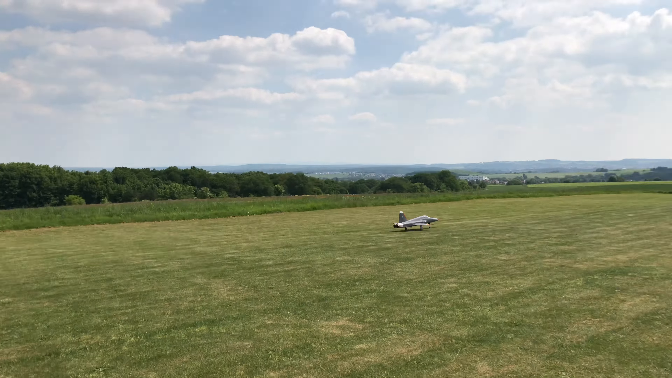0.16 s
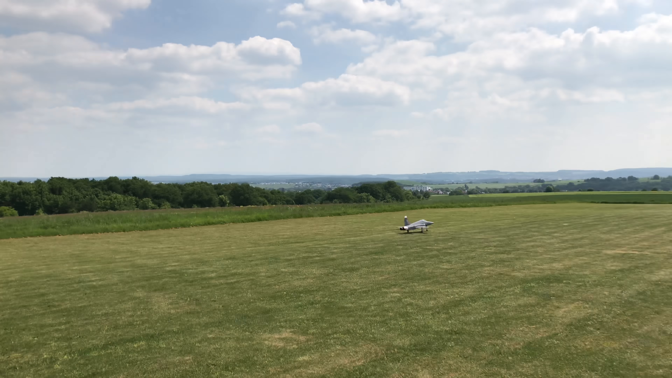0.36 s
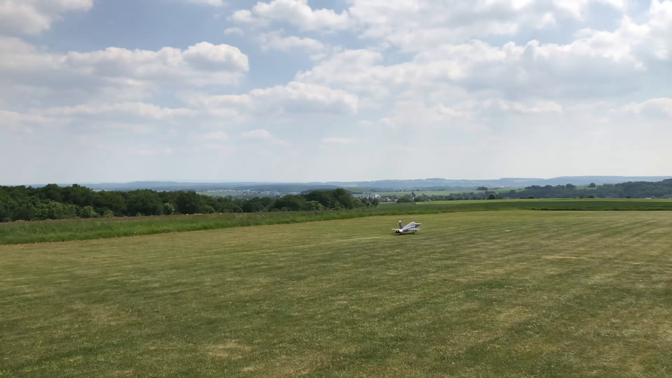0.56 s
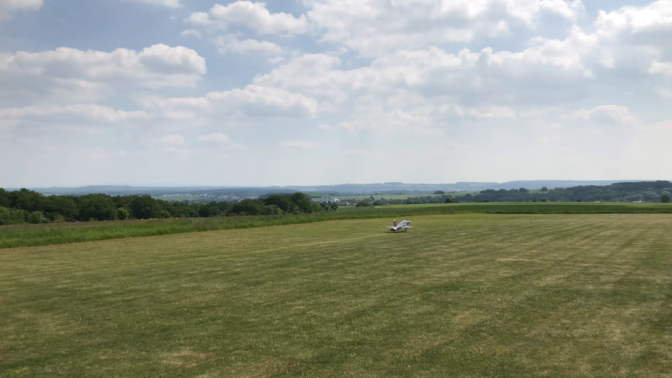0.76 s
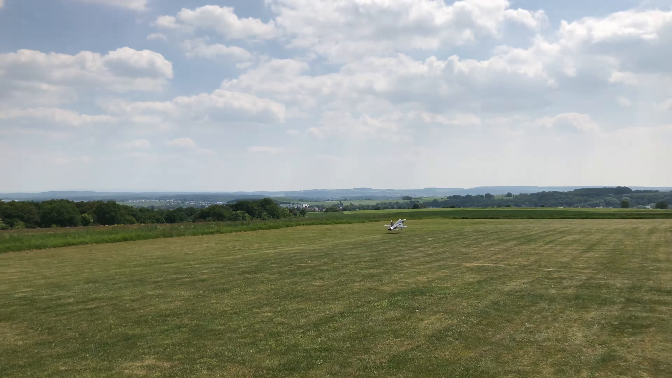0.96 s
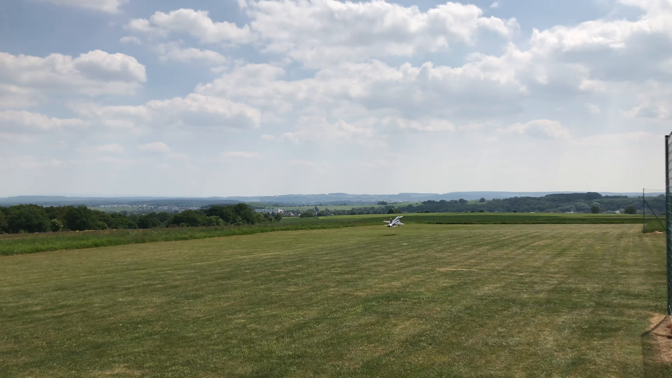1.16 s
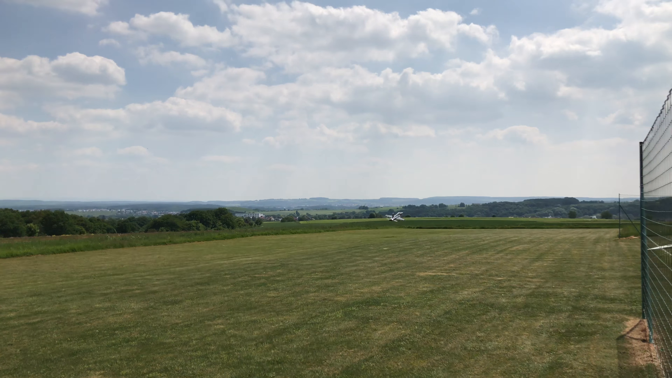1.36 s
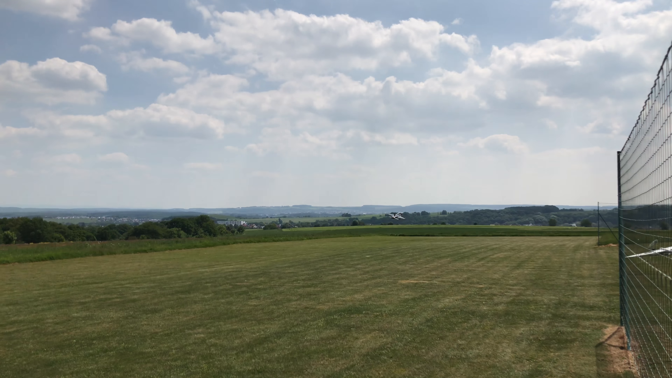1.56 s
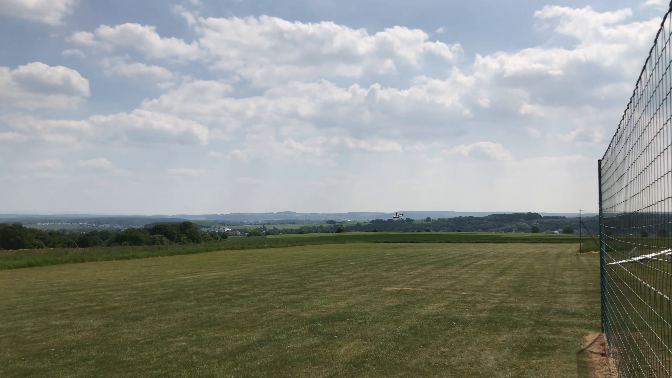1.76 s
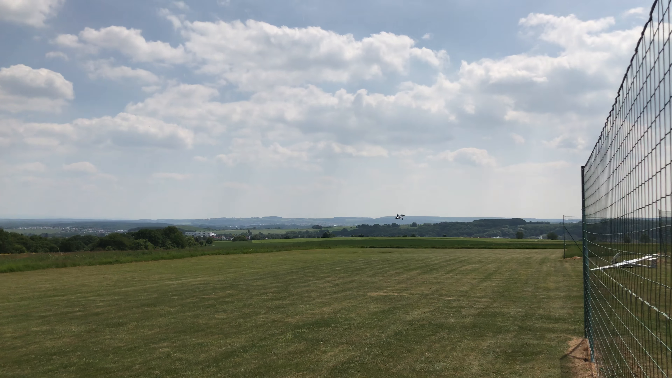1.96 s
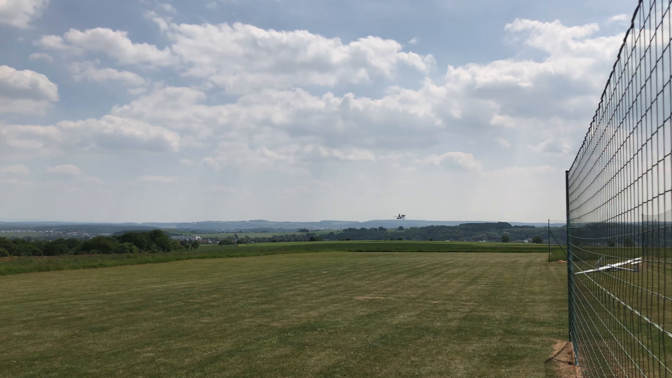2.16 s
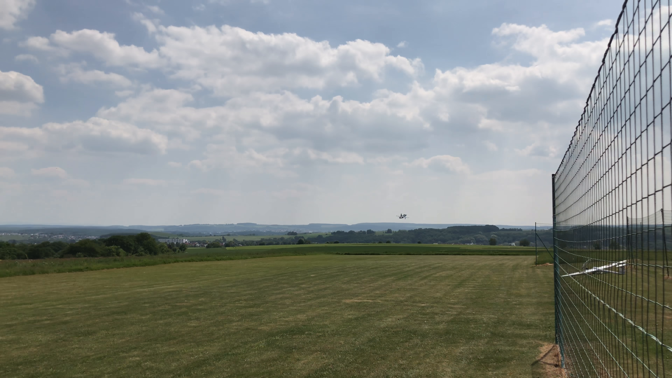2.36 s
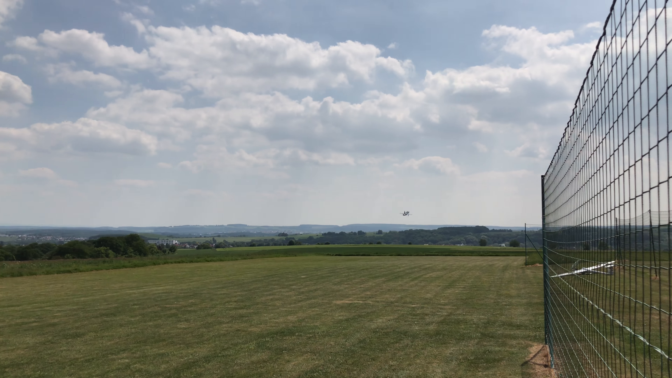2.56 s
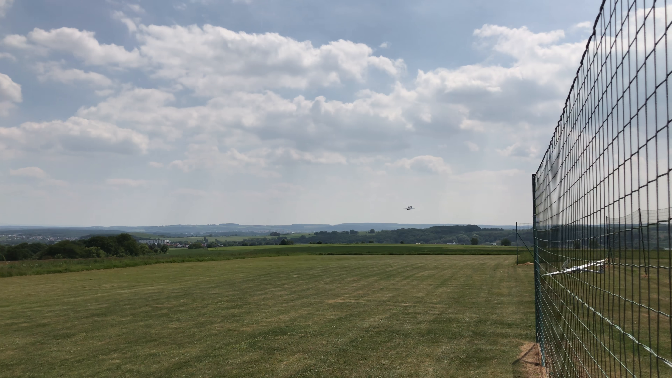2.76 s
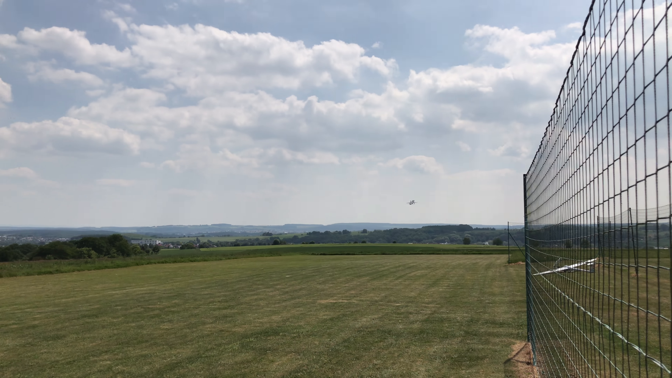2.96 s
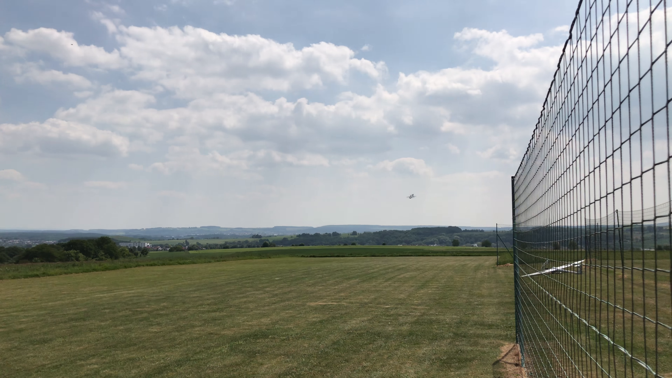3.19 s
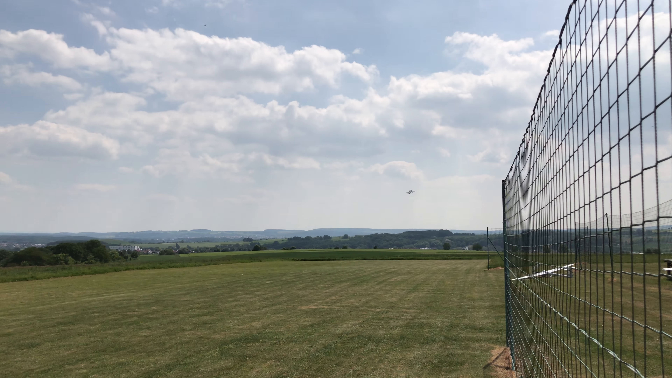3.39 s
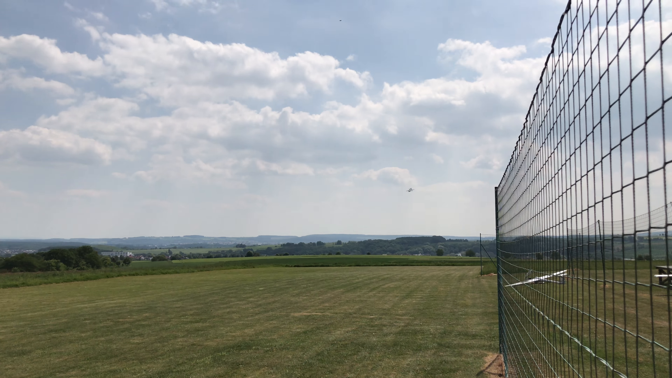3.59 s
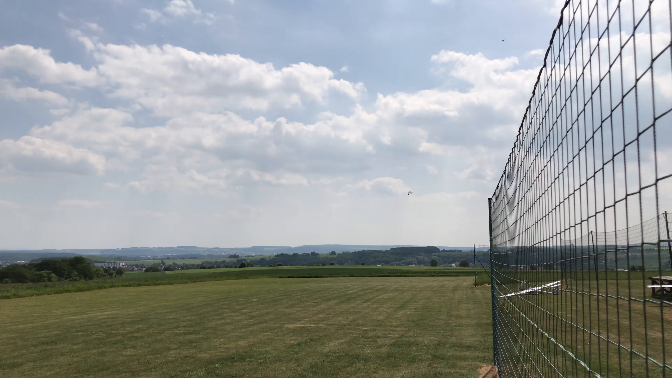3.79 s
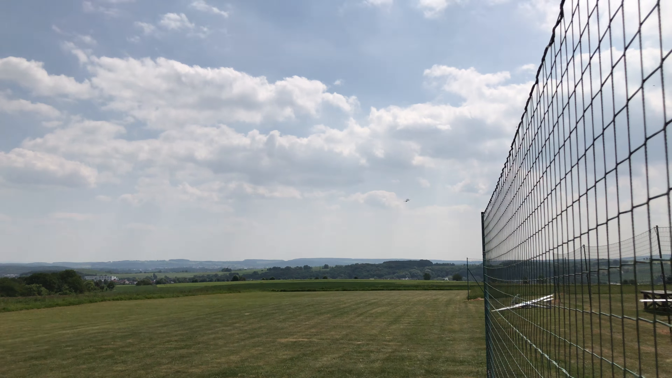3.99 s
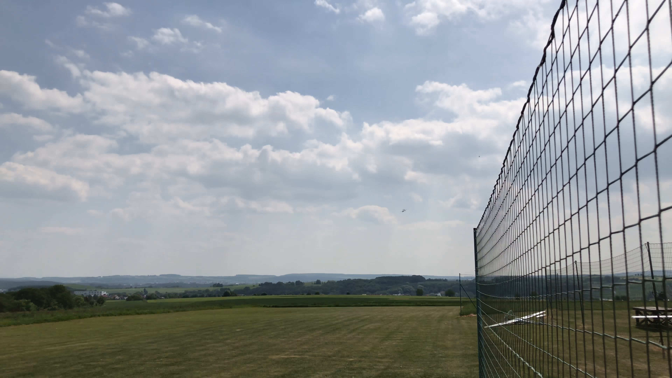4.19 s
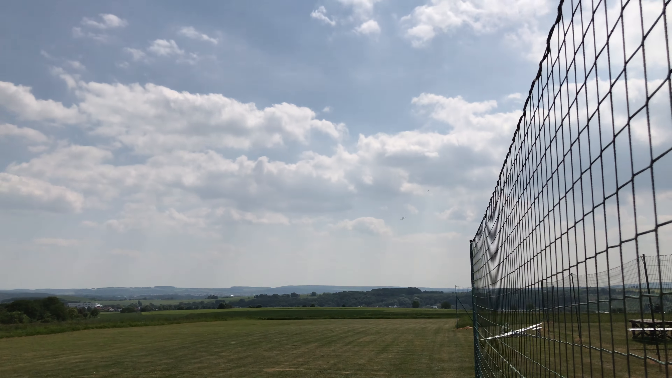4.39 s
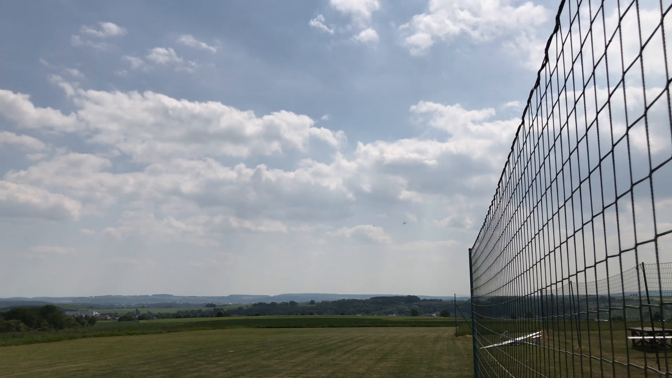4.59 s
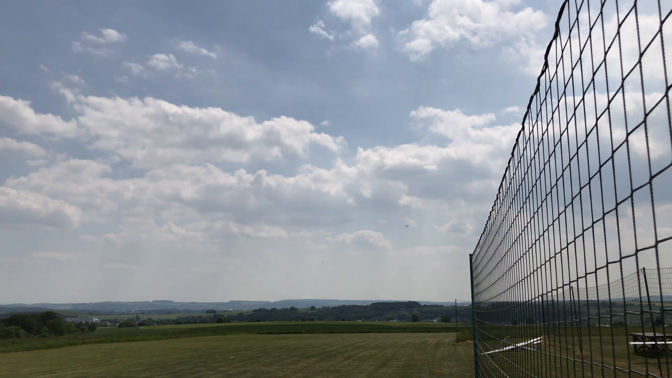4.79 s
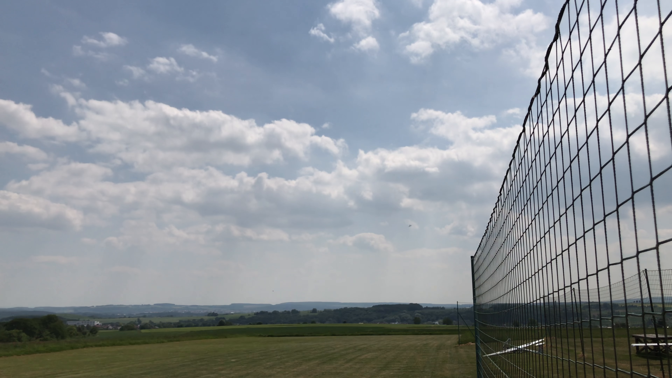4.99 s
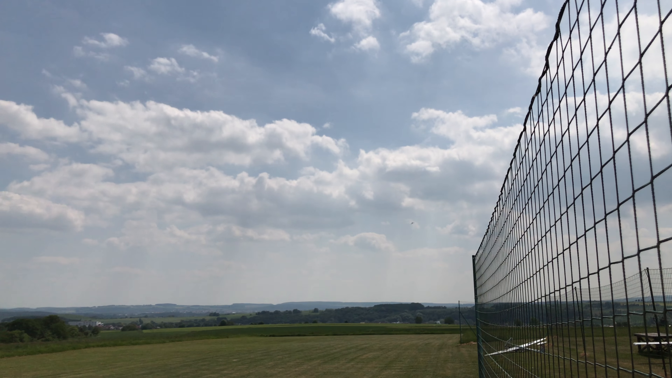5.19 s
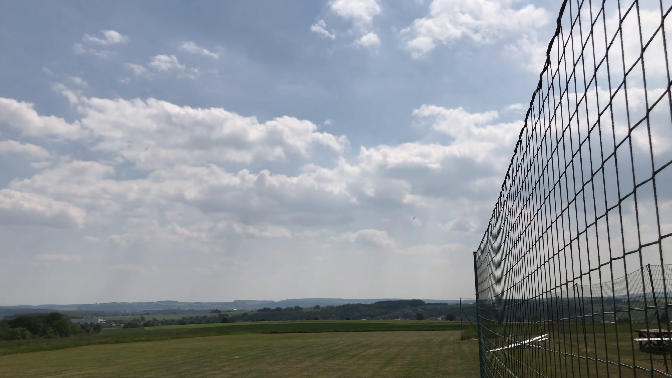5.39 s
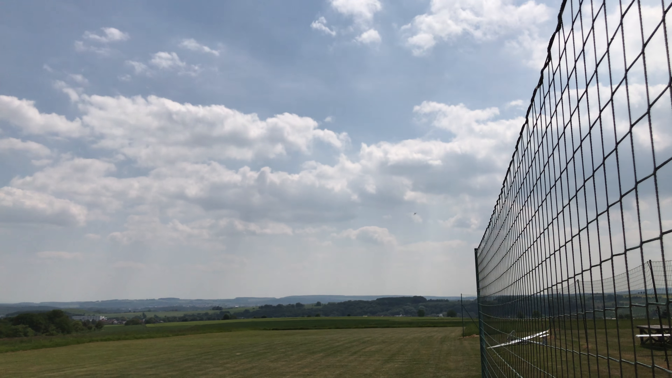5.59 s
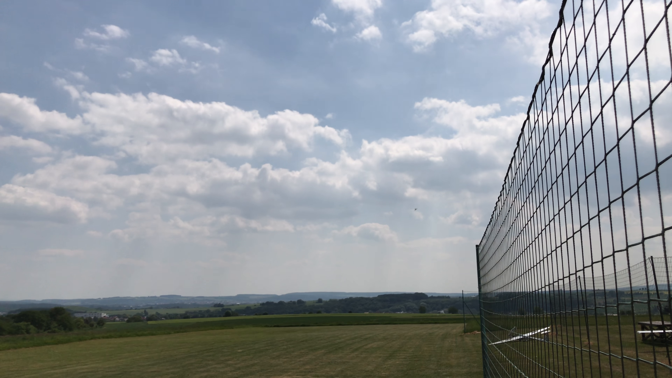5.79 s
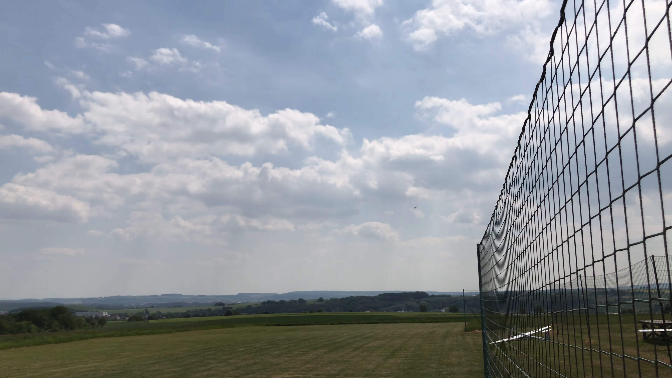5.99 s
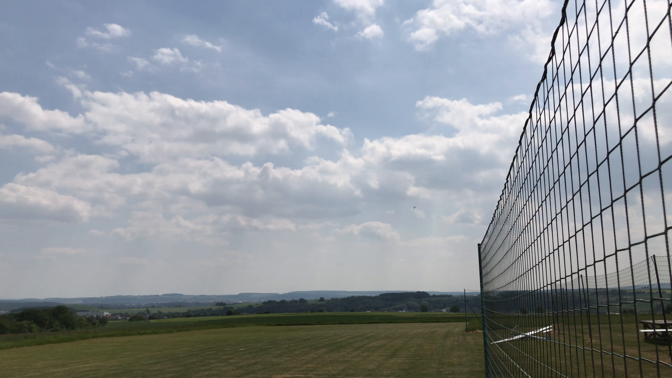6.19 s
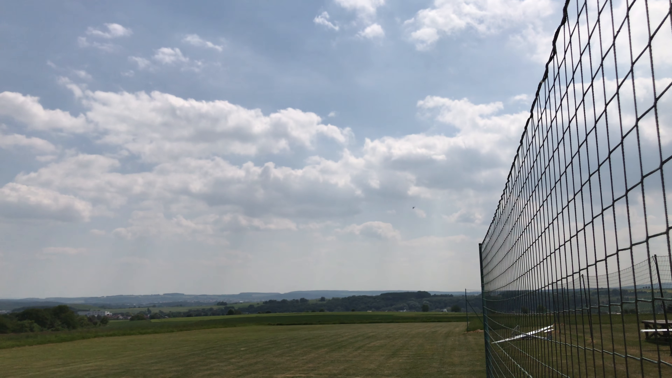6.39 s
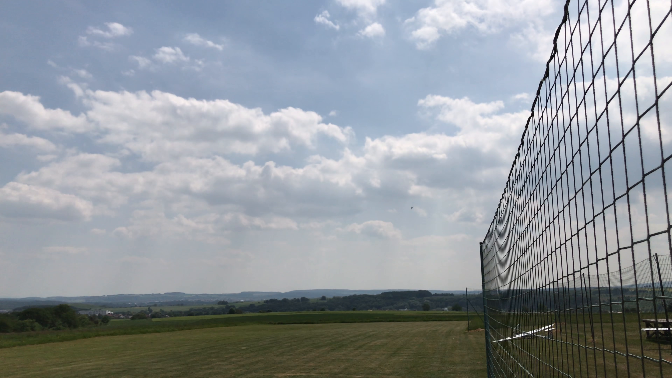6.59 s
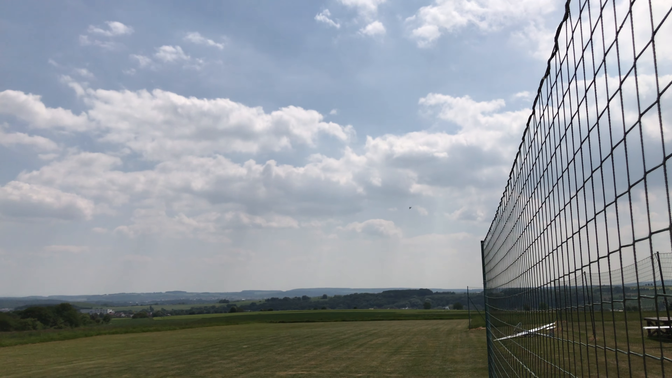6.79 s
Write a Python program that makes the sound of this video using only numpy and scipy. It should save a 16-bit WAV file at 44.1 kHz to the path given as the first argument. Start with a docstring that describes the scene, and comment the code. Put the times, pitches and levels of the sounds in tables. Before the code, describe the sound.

A model jet's high electric fan whine and rushing hiss fade as it flies away over a field, later dropping in pitch.

```python
"""Model jet taking off from grass

Two electric ducted fans whine slightly apart in pitch over their hiss and the roar of the exhaust;
turbulent air smears the tones. As the jet climbs away, interference with the echo off the grass sweeps
a comb of notches down through the noise, and air absorption dulls it. Far out the throttle is pulled
back, then opened a little. A breeze and a low hum rumble underneath."""
import sys
import numpy as np
from scipy import signal
from scipy.fft import rfft, irfft
from scipy.io import wavfile
from scipy.ndimage import uniform_filter1d

SR = 44100
rng = np.random.default_rng(int(sys.argv[2]) if len(sys.argv) > 2 else 0)


def wav_out(sig):
    """Save sig, one row per channel (or a flat mono array), as 16-bit PCM at SR to the path in sys.argv[1]."""
    wavfile.write(sys.argv[1], SR, np.round(np.clip(np.atleast_2d(sig).T, -1, 1) * 32767).astype(np.int16))


N = 302085
SIZE, HOP = 2048, 256
T = np.arange(N) / SR
FRAME_T = np.arange(N // HOP + 3) * HOP / SR
BIN_HZ = np.fft.rfftfreq(SIZE, 1 / SR)
START_M, TOP_SPEED_M_PER_S, SPEED_UP_S, SOUND_M_PER_S = 5.1, 20, 1.6, 343
FULL_HZ = 5235  # blade-passing frequency of the slower fan at full throttle

# The fans' treble, hiss and octave alike. Each row: time in seconds, relative level in dB.
TREBLE_LEVEL = [(0.0, -29.5), (0.22, -26.5), (0.28, -30.5), (0.4, -27.5), (0.67, -39), (0.77, -35.5),
                (0.84, -42.5), (1.12, -39), (1.22, -46), (1.32, -43), (2.38, -48.5), (3.27, -57.5),
                (3.45, -54.9), (3.8, -63), (3.95, -60), (4.27, -78.5), (4.47, -69.5), (4.7, -85),
                (5.37, -80.5), (5.87, -94.5), (6.85, -94)]
# The exhaust's roar. Each row: time in seconds, relative level in dB.
EXHAUST_LEVEL = [(0.0, -36), (0.12, -35.5), (0.25, -38.5), (1.17, -45.5), (1.65, -37), (2.07, -36.5),
                 (5.5, -59.5), (6.85, -60)]


def amp(db):
    """Amplitude ratio of a level in decibels."""
    return 10 ** (np.asarray(db) / 20)


def unit(x):
    """Normalisation to an rms of 1."""
    return x / np.sqrt(np.mean(abs(x) ** 2) + 1e-20)


def curve(rows, t):
    """Linear interpolation of a table of times and values."""
    return np.interp(t, *np.transpose(rows))


def shape(spectrum):
    """Gain per bin, interpolated in decibels on a log-frequency axis."""
    hz, db = np.transpose(spectrum)
    return amp(np.interp(np.log(BIN_HZ + 1), np.log(hz), db))


def flutter(width_hz, steep_above=2, steep_below=2):
    """Narrow-band complex noise of rms 1, falling away beyond width_hz on either side of zero."""
    hz = np.fft.fftfreq(N, 1 / SR)
    steep = np.where(hz > 0, steep_above, steep_below)
    white = rng.standard_normal(N) + 1j * rng.standard_normal(N)
    return unit(np.fft.ifft(white / np.sqrt(1 + abs(hz / width_hz) ** (2 * steep))))


def noise(gain, band_hz):
    """Spectral shaping of white noise, held near an rms of 1 inside the band."""
    inside = (BIN_HZ >= band_hz[0]) & (BIN_HZ <= band_hz[1])
    gain = gain / np.sqrt(np.sum(gain[..., inside] ** 2, -1, keepdims=True) / len(BIN_HZ))
    white = rng.standard_normal((len(FRAME_T) - 1) * HOP)
    frames = signal.stft(white, nperseg=SIZE, noverlap=SIZE - HOP)[2].T * gain
    return signal.istft(frames.T, nperseg=SIZE, noverlap=SIZE - HOP)[1][:N]


def speed(t):
    """Drag limits acceleration: the receding jet's speed in m/s levels off exponentially."""
    return TOP_SPEED_M_PER_S * (1 - np.exp(-t / SPEED_UP_S))


def distance(t):
    """Metres from the microphone: the start plus the integral of the speed."""
    return START_M + TOP_SPEED_M_PER_S * t - SPEED_UP_S * speed(t)


def throttle(t):
    """Fan speed, 1 at full power, is proportional to the blade-passing frequency."""
    # The slower fan on board. Each row: time in seconds, blade-passing frequency in Hz.
    blade_passing = [(3.92, FULL_HZ), (4.0, 4870), (4.1, 4555), (4.22, 4360), (4.33, 4020), (4.53, 3905),
                     (4.65, 3525), (5.5, 3335), (5.95, 3490), (6.35, 3500), (6.63, 3850), (6.72, 4145),
                     (6.85, 4260)]
    return curve(blade_passing, t) / FULL_HZ


def doppler_pitch(t):
    """The Doppler effect lowers the slower fan's tone, in Hz, as the jet recedes."""
    return FULL_HZ * throttle(t) / (1 + speed(t) / SOUND_M_PER_S)


def blade_tone(hz, clean_share, halo_hz, halo_shift_hz=20):
    """Random modulation: blades chopping turbulence spread a lopsided halo around a wavering line."""
    line = unit(1 + .35 * flutter(6))
    halo = flutter(halo_hz, steep_above=1.3, steep_below=1.85)
    halo = halo * np.exp(2j * np.pi * halo_shift_hz * T)
    envelope = np.sqrt(clean_share) * line + np.sqrt(1 - clean_share) * halo
    carrier = np.exp(2j * np.pi * np.cumsum(hz) / SR)
    return np.sqrt(2) * (carrier * envelope).real


def fan_whine(gain_db=-.5, lead_hz=213, closing_hz_per_s=19, smear_m=32):
    """Blade passage gives each fan a tone and its octave; turbulence on the path broadens both."""
    # The fan tones. Each row: time in seconds, relative level in dB.
    tone_level = [(0.0, -21.5), (0.23, -21.0), (0.3, -24.5), (0.57, -26.5), (0.65, -35.5), (0.77, -25.5),
                  (0.85, -34), (0.92, -26), (1.03, -35.5), (1.17, -26), (1.27, -45.5), (1.42, -26),
                  (1.55, -34.8), (1.77, -28.5), (1.9, -38), (2.07, -33.5), (2.92, -36), (3.05, -44.1),
                  (3.4, -40.5), (3.82, -50.5), (4.05, -44.5), (4.8, -58.5), (5.12, -53.5), (5.72, -72),
                  (6.85, -62.5)]
    # Balance of the fans. Each row: time in seconds, the faster fan's share of the power.
    balance = [(0, 0.32), (1.25, 0.63), (1.5, 0.73), (2.2, 0.6), (2.6, 0.24), (4.1, 0.42), (6.85, 0.5)]
    slower_hz, fan_speed, share = doppler_pitch(T), throttle(T), curve(balance, T)
    faster_hz = slower_hz + (lead_hz - closing_hz_per_s * T) * fan_speed ** 3
    clean_share = .6 * np.exp(-distance(T) * fan_speed ** 8 / smear_m)
    tone_db = curve(tone_level, T) + gain_db
    slowing_db = 59 * (1 - fan_speed)  # the weak octave stands out as the fans slow
    fading_db = 2.5 * unit(flutter(2).real)
    octave_db = curve(TREBLE_LEVEL, T) - 11 + slowing_db + fading_db
    out = np.zeros(N)
    for hz, power in ((slower_hz, 1 - share), (faster_hz, share)):
        tone = blade_tone(hz, clean_share, halo_hz=120)
        octave = blade_tone(2 * hz, clean_share / 3, halo_hz=200)
        out += np.sqrt(power) * (amp(tone_db) * tone + amp(octave_db) * octave)
    return out


def eddy_fading(depth_db):
    """Scintillation: eddies on the path fade single bands in and out."""
    white = rng.standard_normal((len(FRAME_T), len(BIN_HZ)))
    patches = uniform_filter1d(uniform_filter1d(white, 14, axis=0), 36, axis=1)
    return amp(depth_db * unit(patches))


def ground_comb(mic_height_m=1.6, soft_hz=140, rough_hz=11000):
    """Interference of the direct sound with its echo off uneven grass makes a comb filter."""
    # The climb. Each row: time in seconds, the jet's angle above the grass in degrees.
    climb = [(0, 0.27), (1.25, 0.27), (1.97, 2.62), (2.65, 2.97), (3.5, 4.5), (4.0, 6.25), (5.1, 9),
             (6.85, 10)]
    degrees = curve(climb, FRAME_T[:, None])
    reflection = .72 - .033 * degrees  # weaker at steeper angles
    reflection = reflection / (1 + (BIN_HZ / rough_hz) ** 2)  # roughness scatters the treble
    jitter = 1 + .035 * np.interp(FRAME_T, T, flutter(6).real)[:, None]
    lag_s = 2 * mic_height_m * np.sin(np.radians(degrees)) / SOUND_M_PER_S * jitter
    inversion = 2 * np.arctan(BIN_HZ / soft_hz)  # grass inverts all but the bass
    phase = 2 * np.pi * BIN_HZ * lag_s + inversion
    return abs(1 + reflection * np.exp(-1j * phase))


def blade_hiss(gain_db=-1.55, knee_hz=2600, air_db_per_khz_m=.0611):
    """Air absorption dulls the blades' broadband noise with distance; swells briefly brighten it."""
    # The hiss before absorption. Each row: frequency in Hz, relative spectral density in dB.
    spectrum = [(450, -28), (1200, -6.5), (1800, -3.5), (2600, -4.5), (3100, -5), (3700, -1), (4400, 1.5),
                (6000, 3), (7500, -1), (8500, 2), (11000, 1), (13500, -1.5), (16000, 2.5), (17500, -1)]
    level_db = curve(TREBLE_LEVEL, FRAME_T)
    swell_db = level_db - uniform_filter1d(level_db, size=170, mode="nearest")
    loss_db_per_khz = (air_db_per_khz_m * distance(FRAME_T) - .082 * swell_db)[:, None]
    air = amp(-loss_db_per_khz * np.maximum(BIN_HZ, knee_hz) / 1000)
    gain = shape(spectrum) * air * eddy_fading(depth_db=1.6) * ground_comb()
    return noise(gain, band_hz=(6900, 9700)) * amp(curve(TREBLE_LEVEL, T) + gain_db)


def exhaust_roar(gain_db=-2, lift_off_s=1.64, swing_s=.24):
    """Turbulent mixing behind the ducts roars, brighter as the nozzles swing round at lift-off."""
    # The mixing noise. Each row: frequency in Hz, relative spectral density in dB.
    spectrum = [(100, -27), (300, -8.5), (480, -5.5), (700, 0), (1000, -2), (1400, -3.5), (2000, -7.5),
                (3000, -10.5), (5000, -19.5), (9000, -54)]
    doublings = np.log2(distance(FRAME_T[:, None]) / START_M)
    swing = np.exp(-((FRAME_T[:, None] - lift_off_s) / swing_s) ** 2)
    tilt_db_per_octave = 2 * swing - .62 * doublings  # duller with each doubling of distance
    tilt = amp(tilt_db_per_octave * np.log2(BIN_HZ + 1))
    gain = shape(spectrum) * tilt * ground_comb() * eddy_fading(depth_db=.5)
    return noise(gain, band_hz=(500, 1600)) * amp(curve(EXHAUST_LEVEL, T) + gain_db)


def shaft_hum(gain_db=-1, off_resonance_db=-19, blades=11):
    """Forced vibration: shaft harmonics sing out as they slide through airframe resonances."""
    # Rotor vibration. Each row: multiple of the shaft speed, relative level in dB.
    harmonics = [(1, -12), (3, -17), (4, -5.5), (5, -15), (6, -2.5)]
    # Airframe resonances. Each row: centre in Hz, width in Hz, peak gain in dB.
    resonances = [(370, 80, -1), (1370, 50, 1), (2040, 70, 0)]
    shaft_hz = doppler_pitch(T) / blades
    out = np.zeros(N)
    for order, db in harmonics:
        hz = order * shaft_hz
        ring = sum(amp(peak) / (1 + (2 * (hz - centre) / width) ** 2)
                   for centre, width, peak in resonances)
        carrier = np.exp(2j * np.pi * np.cumsum(hz) / SR)
        tone = unit((carrier * (1 + .6 * flutter(12))).real)
        out += amp(db) * (ring + amp(off_resonance_db)) * tone
    return out * amp(curve(EXHAUST_LEVEL, T) + gain_db)


def ground_rush(gain_db=-41):
    """Spherical spreading: the jet's low rush along the ground falls inversely with distance."""
    # The rush. Each row: frequency in Hz, relative spectral density in dB.
    spectrum = [(40, -15.5), (110, -2), (170, 6.5), (250, 4), (320, -3.5), (400, -14.5), (900, -39),
                (3000, -68)]
    return noise(shape(spectrum), band_hz=(140, 330)) * START_M / distance(T) * amp(gain_db)


def far_hum(cycle_hz=22.6):
    """A harmonic series on one slow, wavering cycle, as of an engine far off."""
    # The hum. Each row: multiple of the cycle rate, relative level in dB.
    harmonics = [(2, -0.5), (3, -0.5), (4, -2.5), (5, -2.5)]
    turns = np.cumsum(cycle_hz * (1 + .02 * flutter(1).real)) / SR
    return unit(sum(amp(db) * np.sin(2 * np.pi * (order * turns + rng.random()))
                    for order, db in harmonics))


def rumble(gain_db=-.34):
    """Superposition: the breeze's low noise and the far hum swell and sink together."""
    # The breeze. Each row: frequency in Hz, relative spectral density in dB.
    spectrum = [(22, -50), (32, -14.5), (43, -8), (66, 2), (85, -5.5), (115, 1.5), (145, -22), (300, -35),
                (1500, -63)]
    # Breeze and hum together. Each row: time in seconds, relative level in dB.
    level = [(0.0, -48), (0.92, -49), (1.47, -57), (1.67, -50.5), (3.85, -55.5), (4.7, -47.5), (5.72, -55),
             (6.85, -52)]
    breeze = noise(shape(spectrum), band_hz=(30, 120))
    return unit(breeze + .9 * far_hum()) * amp(curve(level, T) + gain_db)


def country_wash(gain_db=-73.8):
    """Stationary ambient noise: the faint wash of open country."""
    # The wash. Each row: frequency in Hz, relative spectral density in dB.
    spectrum = [(50, 13), (200, 20), (350, 28), (420, 25), (600, 31), (850, 25), (1200, 26), (2000, 11),
                (5000, 2), (9400, 0), (10400, -3), (12000, 0), (17000, 0)]
    return noise(shape(spectrum), band_hz=(2000, 16000)) * amp(gain_db)


def scene():
    """The sources add; turbulent air modulates the amplitude of whine and hiss together."""
    flicker_db = .95 * unit(flutter(28).real)
    surge_db = .38 * unit(flutter(7).real)
    fans = (fan_whine() + blade_hiss()) * amp(flicker_db + surge_db)
    return (fans + exhaust_roar() + shaft_hum() + ground_rush() + rumble() + country_wash())[None]


def record(dry, low_cut_hz=35, high_cut_hz=17300):
    """Linear filtering: colour and bass cut at the microphone, then the band limit."""
    # Peaks and dips at the microphone. Each row: centre in Hz, width in Hz, gain in dB.
    peaks = [(400, 45, -3), (480, 30, 2), (705, 60, 4), (850, 55, -3.5), (1165, 45, 3), (1260, 35, -2),
             (1360, 60, 2), (1620, 60, -1.5)]
    hz = np.fft.rfftfreq(N, 1 / SR)
    colour_db = sum(db * np.exp(-((hz - centre) / width) ** 2) for centre, width, db in peaks)
    low_cut = 1 - 1 / (1 + (hz / low_cut_hz) ** 6)
    coloured = irfft(rfft(dry) * amp(colour_db) * low_cut, N)
    low_pass = signal.firwin(511, high_cut_hz, window=("kaiser", 9), fs=SR)
    return signal.oaconvolve(coloured, low_pass[None], "same")


dry = scene()
out = record(dry)
wav_out(out)
```